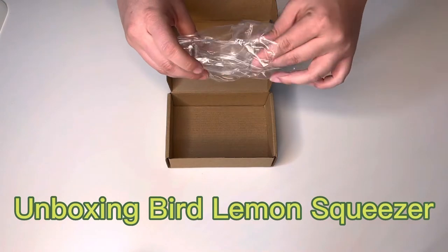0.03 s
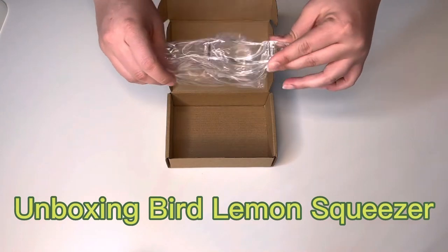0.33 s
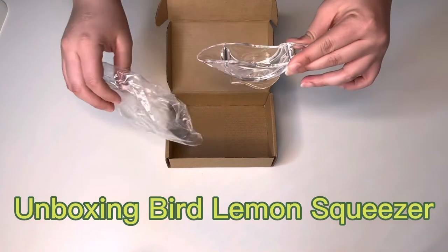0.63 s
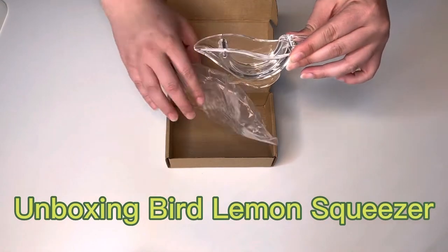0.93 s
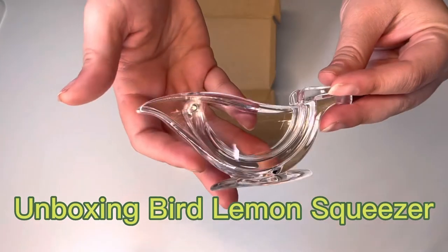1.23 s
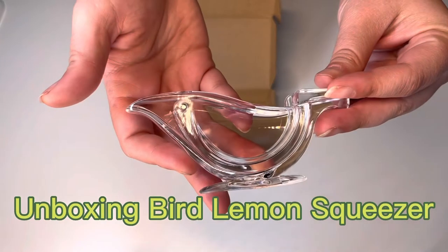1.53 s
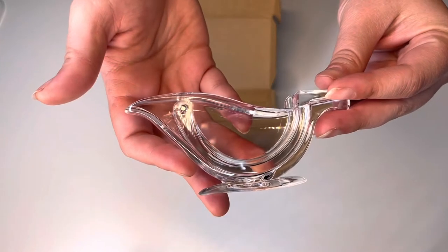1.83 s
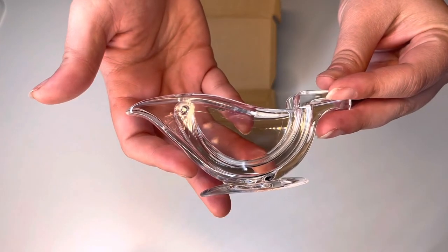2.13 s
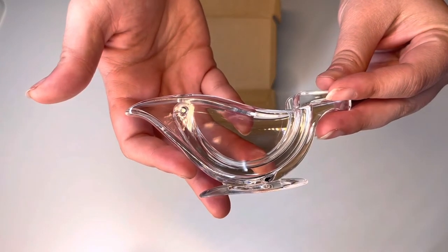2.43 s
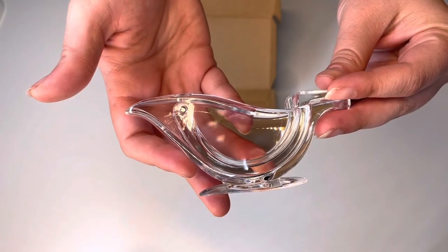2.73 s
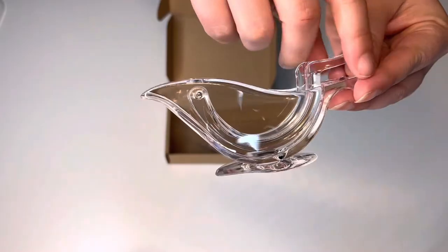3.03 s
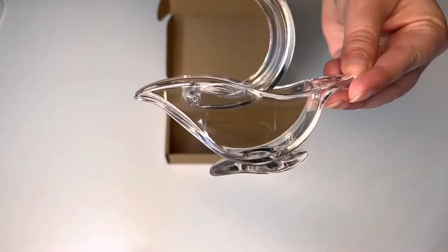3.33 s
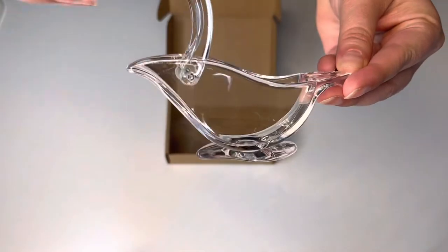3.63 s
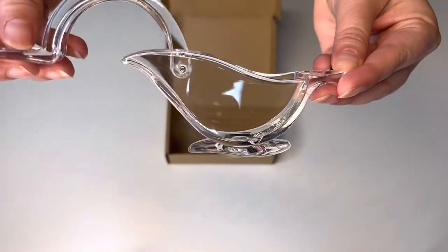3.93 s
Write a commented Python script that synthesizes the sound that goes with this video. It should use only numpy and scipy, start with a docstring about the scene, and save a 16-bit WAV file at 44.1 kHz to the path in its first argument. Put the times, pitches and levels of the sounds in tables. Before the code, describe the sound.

Close crackling of a thin plastic bag being pulled off a lemon squeezer, with soft bumps on cardboard. A lull follows, then a few light plastic clicks and duller hinge ticks, over the low rumble of a small room.

```python
"""Unwrapping a lemon squeezer

A thin plastic bag snaps and crinkles as its film buckles, pulled off a plastic lemon squeezer
close to the microphone, and drops on a cardboard box. Fingers rub the plastic; the lever is
lifted and clicks against the bowl, and the hinge slips. A small room rumbles and hums
throughout, and the sound drops out briefly twice."""
import sys
import numpy as np
from scipy import signal
from scipy.fft import rfft, irfft
from scipy.io import wavfile
from scipy.ndimage import uniform_filter1d

SR = 44100
rng = np.random.default_rng(int(sys.argv[2]) if len(sys.argv) > 2 else 0)


def unload_audio(sound):
    """Save the sound as a 16-bit wav file, at the path given as the first command line argument."""
    columns = np.transpose(np.atleast_2d(sound))
    # keep every value between -1 and 1, then stretch to whole-number steps
    steps = np.round(np.clip(columns, -1, 1) * 32767)
    wavfile.write(sys.argv[1], SR, steps.astype(np.int16))


N = 176400
TIME_S = np.arange(N) / SR
FREQS_HZ = np.maximum(np.arange(N + 1) * SR / (2 * N), 1)
TOP_HZ = 16000


def from_db(db):
    """Decibels to gain."""
    return 10 ** (np.asarray(db) / 20)


def unit_rms(x):
    """Scale to rms 1."""
    return x / np.sqrt(np.mean(x ** 2) + 1e-20)


def at_hz(table, hz):
    """Read a table on a log-frequency axis."""
    table_hz, values = np.transpose(table)
    return np.interp(np.log(hz), np.log(table_hz), values)


def colour(x, gain):
    """Apply a gain per frequency."""
    return irfft(rfft(x, 2 * N) * gain)[..., :N]


def drift(rate_hz):
    """Slow wander between unit-normal random values."""
    knots = rng.standard_normal(1000)
    return np.interp(TIME_S * rate_hz, np.arange(len(knots)), knots)


def add(out, start_s, sound):
    """Mix a sound in at a time."""
    i = int(np.clip(start_s * SR, 0, N - 1))
    out[i:i + len(sound)] += sound[:N - i]


def spread(pair, correlation):
    """Mix two independent signals to left and right with a correlation per frequency."""
    alike = np.clip(at_hz(correlation, FREQS_HZ), -1, 1)
    mid, side = colour(pair, np.sqrt(np.array([1 + alike, 1 - alike]) / 2))
    return np.array([mid + side, mid - side])


# Ventilation noise: (frequency [Hz], density [dB])
RUMBLE_SPECTRUM = [(20,-26.5), (32,-17.5), (45,-1.5), (60,0.5), (74,3.5), (92,-11.5), (140,-5.5), (180,-10),
                   (206,-6.5), (250,-12.5), (320,-19.5), (520,-19), (700,-29), (1000,-29), (2000,-48),
                   (4000,-56.5), (7000,-64), (11500,-66), (15000,-75)]
# Rumble, left to right: (frequency [Hz], correlation [-1..1])
RUMBLE_CORRELATION = [(60,.98), (150,0.94), (380,.5), (950,-0.35), (2400,0.085), (6000,0.41), (8500,.93),
                      (12000,0.82)]

def background(rumble_db=-49.5, hum_hz=119.1, hum_db=-56, waver_hz=0.48, waver_db=4):
    """Ventilation rumble and a wavering mains hum."""
    gain = from_db(at_hz(RUMBLE_SPECTRUM, FREQS_HZ)) * (FREQS_HZ > 15)
    rumble = spread(colour(rng.standard_normal((2, N)), gain), RUMBLE_CORRELATION)
    pitch_hz = hum_hz + waver_hz * drift(8.8)
    hum = np.sqrt(2) * np.sin(2 * np.pi * np.cumsum(pitch_hz) / SR)
    return from_db(rumble_db) * unit_rms(rumble) + from_db(hum_db + waver_db * drift(7.8)) * hum


def crack(spectrum, t60_at_2khz_s, bass_db=0, treble_db=0, modes=60, size=900):
    """A buckle or contact rings short modes at random pitches, the high ones dying first; peak 1."""
    edges = np.linspace(np.sqrt(200), np.sqrt(TOP_HZ), modes + 1)
    hz = (edges[:-1] + np.diff(edges) * rng.random(modes)) ** 2
    tilt_db = at_hz([(800, bass_db), (2000, 0), (3000, 0), (9000, treble_db)], hz)
    gain = from_db(at_hz(spectrum, hz) + tilt_db) * hz ** 0.25 * rng.choice([-1, 1], modes)
    t60_s = t60_at_2khz_s * (2000 / hz) ** 0.27
    t = TIME_S[:size, None]
    rings = np.sin(2 * np.pi * hz * t) * from_db(-60 * t / t60_s)
    out = rings @ (gain / np.sqrt(t60_s))
    return out / np.abs(out).max()


# Bag film: (frequency [Hz], density [dB])
FILM_SPECTRUM = [(200,-17), (400,-12), (560,-3.5), (750,-1), (1050,-7), (1350,-8.5), (1700,-2.5), (2100,-4),
                 (2700,-3.5), (3300,-1), (4300,-8.5), (6500,-6.5), (8500,-11.5), (11000,-13), (13500,-17.5),
                 (15500,-19)]
FILM_T60_S, BUCKLE_LEAD_S = 0.01, 0.002

def snap(bass_db, treble_db, buckles=4, weaker_db=-8.5):
    """A crease gives way in a run of buckles, the strongest BUCKLE_LEAD_S in; peak 1."""
    out = np.zeros(SR // 20)
    for k in range(buckles):
        lag_s, db = (rng.uniform(0, 3) * BUCKLE_LEAD_S, weaker_db) if k else (BUCKLE_LEAD_S, 0)
        add(out, lag_s, from_db(db) * crack(FILM_SPECTRUM, FILM_T60_S, bass_db, treble_db))
    return out / np.abs(out).max()


def pop(hz, modes=120, size=1800, width_oct=0.23):
    """A panel of film flips over: a crack strongest around one pitch; peak 1."""
    grid_hz = np.geomspace(200, TOP_HZ, 100)
    hump_db = -20 * np.log10(1 + (np.log2(grid_hz / hz) / width_oct) ** 2)
    return crack(np.column_stack([grid_hz, hump_db]), t60_at_2khz_s=0.012, modes=modes, size=size)


def crinkle(centre_hz=2800, spread_oct=1.2, pop_db=-6):
    """A small facet buckles: a crack of random brightness with a hint of pitch."""
    bass_db, treble_db = rng.normal(0, 2.4, 2)
    hz = centre_hz * 2 ** (spread_oct * rng.standard_normal())
    buckle = crack(FILM_SPECTRUM, FILM_T60_S, bass_db, treble_db, modes=30)
    return buckle + from_db(pop_db) * pop(hz, modes=40, size=len(buckle))


# Loud buckles: (time [s], level [dB], bass [dB], treble [dB])
FILM_SNAPS = [(.038,-40,-19.5,10), (0.0439,-34.5,-21.5,-36.5), (0.067,-38,-7,13.5), (0.0938,-34,-3.5,-1),
              (0.112,-35,-3.5,8), (0.114,-33,19,10), (0.135,-32,1,3), (.142,-31,-9,9), (.166,-29.5,1,8),
              (.174,-28,2.5,-3.5), (.199,-19.5,-10.5,3), (0.2125,-33,-15,13.5), (.230,-28.5,-14.5,4.5),
              (0.233,-23,-6,-1.5), (.2405,-28.5,2.5,6), (0.2533,-27.5,-15,0), (0.2567,-27.5,-10,0),
              (.2645,-26,-16,-4), (.289,-36.5,2.5,-15), (0.3106,-35,-10,20), (.322,-29.5,-7.5,-3.5),
              (.460,-43,9,-1), (.475,-44.5,-2,-15), (.495,-42.5,-13,-12), (.523,-37,12,2.5),
              (.540,-39.5,12.5,1), (.561,-44,7,-4), (0.584,-40.5,14,-2), (.625,-45.5,12,7),
              (.643,-44,11,-0.5), (.658,-43.5,0,3), (0.677,-55,-9.5,19), (.699,-36.5,-1,-17),
              (0.704,-37.5,-10,-6), (0.729,-39.5,6,-6), (0.763,-35,2.5,0), (.794,-36.5,-1,6),
              (.852,-41,11,7), (.862,-35.5,21.5,15.5), (.902,-50.5,-3,6), (.960,-35,5.5,-8.5),
              (.965,-40,4,-22), (1.005,-35.5,10,14), (1.0109,-35.5,5,-0.5)]
# Larger panels flipping: (time [s], pitch [Hz], level [dB])
PANEL_POPS = [(0.0464,1920,-34), (.230,2240,-33), (.322,1760,-29.5), (.961,935,-33.5), (1.010,3537,-43.5)]
# How hard the bag is worked: (time [s], level [dB])
HANDLING_EFFORT = [(0,-49), (.06,-67), (.105,-56.5), (.165,-36), (.205,-39.5), (.225,-43.5), (.24,-36.5),
                   (.26,-40.5), (.30,-45), (.35,-43), (.39,-56.5), (.56,-54.5), (.66,-64.5), (.735,-56),
                   (.82,-65), (.865,-51), (.93,-76), (.97,-66.5), (1.02,-58)]

def bag(snap_gain_db=2, crinkles_per_s=560, crinkle_db=-3, slide_db=-9.5):
    """Loud snaps and pops over a swarm of small crinkles and the hiss of sliding film."""
    snaps, crinkles = np.zeros(N), np.zeros(N)
    for s, db, bass_db, treble_db in FILM_SNAPS:
        add(snaps, s - BUCKLE_LEAD_S, from_db(db + snap_gain_db) * snap(bass_db, treble_db))
    for s, hz, db in PANEL_POPS:
        add(snaps, s, from_db(db) * pop(hz))
    facets = [crinkle() for _ in range(70)]
    strengths = from_db(4 * np.minimum(rng.exponential(1, N), 3.5))
    picks = rng.integers(0, len(facets), N)
    for i in np.flatnonzero(rng.random(N) < crinkles_per_s / SR):
        add(crinkles, i / SR, strengths[i] * facets[picks[i]])
    film_gain = from_db(at_hz(FILM_SPECTRUM, FREQS_HZ)) * (FREQS_HZ > FILM_SPECTRUM[0][0])
    slide = unit_rms(colour(rng.standard_normal(N), film_gain))
    effort = from_db(np.interp(TIME_S, *np.transpose(HANDLING_EFFORT)))
    return snaps + effort * (from_db(crinkle_db) * unit_rms(crinkles) + from_db(slide_db) * slide)


def strike(modes, rise_s=0.00057, grip_detune=0.01, settle_power=1.42):
    """A blow rings a part: grip detunes each mode, and damping grows as the parts settle."""
    t = TIME_S[:4000]
    ring = 0
    for k, (hz, db, t60_s) in enumerate(modes):
        envelope = from_db(db + rng.normal(0, 1) - 60 * (t / t60_s) ** settle_power)
        detuned_hz = hz * rng.normal(1, grip_detune)
        ring += (-1) ** k * envelope * np.sin(2 * np.pi * detuned_hz * t)
    return (1 - np.exp(-t / rise_s)) * ring


# Bag hitting the box: (time [s], level [dB], hardness [dB/octave])
BOX_BUMPS = [(.698,-36,-0.5), (0.727,-46,0.5), (0.9607,-55.5,4)]
# Box resonances: (frequency [Hz], level [dB], t60 [s])
BOX_MODES = [(361,-3,0.026), (550,-10,0.016), (833,-12,0.036), (1120,-10.5,0.01), (1750,-0.5,0.021)]

def box():
    """Hollow taps of the open cardboard box; a harder bump favours the higher modes."""
    out = np.zeros(N)
    lowest_hz = BOX_MODES[0][0]
    for s, bump_db, db_per_oct in BOX_BUMPS:
        modes = [(hz, db + db_per_oct * np.log2(hz / lowest_hz), t60_s) for hz, db, t60_s in BOX_MODES]
        add(out, s, from_db(bump_db) * strike(modes))
    return out


# Friction on plastic: (time [s], t60 [s], level [dB], centre [Hz], width [octaves])
PLASTIC_RUBS = [(1.04,2,-80.5,2130,.55), (1.04,1.4,-88,5000,1.2), (1.04,0.77,-95.5,10900,0.3),
                (3.26,1.55,-75,1710,0.36), (3.39,0.26,-89,10820,0.14)]

def rubbing():
    """Fingers and lever rub the plastic: soft bands of noise that die away."""
    out = np.zeros(N)
    for s, t60_s, db, hz, width_oct in PLASTIC_RUBS:
        band = np.exp(-(np.log2(FREQS_HZ / hz) / width_oct) ** 2)
        hiss = unit_rms(colour(rng.standard_normal(N), band))
        out += hiss * from_db(db - 60 * np.abs(TIME_S - s) / t60_s) * (TIME_S > s)
    return out


# Lever meeting bowl: (time [s], bowl [dB], lever [dB], tick [dB])
LEVER_CLICKS = [(2.947,-61,-52,-48), (2.957,-63.5,-60,-62), (3.0002,-44,-49,-50), (3.012,-61.5,-38,-39.5),
                (3.0165,-43.5,-31,-39.5), (3.0205,-60.5,-38.5,-44), (3.1428,-33,-68,-36.5),
                (3.1466,-58,-62,-48), (3.1731,-57.5,-45,-50.5)]
# Bowl resonances: (frequency [Hz], level [dB], t60 [s])
BOWL_MODES = [(1662,2,0.017), (2980,-9,0.0097), (3650,-10.5,0.0072), (4300,-30,0.011), (4930,-16,0.008),
              (5320,-13,0.01), (7400,-16,0.012), (10700,-30,0.0092)]
# Lever resonances: (frequency [Hz], level [dB], t60 [s])
LEVER_MODES = [(1774,-12.5,0.011), (1995,-5.5,0.022), (2293,-8,0.018), (2700,-3,0.0092), (3020,-13.5,0.016),
               (3860,-20,0.007), (5600,-30,0.0083)]
# Hard plastic tick: (frequency [Hz], density [dB])
TICK_SPECTRUM = [(300,-22), (1000,11.5), (3000,6.5), (4300,0), (5500,9.5), (7500,-10.5), (8500,4.5),
                 (11000,-4), (13000,-16), (15000,-39)]

def lever():
    """Each contact ticks and rings both bowl and lever."""
    out = np.zeros(N)
    for s, bowl_db, lever_db, tick_db in LEVER_CLICKS:
        add(out, s, from_db(bowl_db) * strike(BOWL_MODES) + from_db(lever_db) * strike(LEVER_MODES))
        add(out, s, from_db(tick_db) * crack(TICK_SPECTRUM, t60_at_2khz_s=0.014))
    return out


# Hinge slipping: (time [s], level [dB])
HINGE_SLIPS = [(3.5126,-46), (3.526,-51.5), (3.9,-58.5)]
# Hinge tick: (frequency [Hz], density [dB])
HINGE_SPECTRUM = [(600,-17), (1400,3), (2050,5), (2800,-11), (3400,-17), (4300,-13), (5500,-35), (7500,-37),
                  (11000,-34), (15000,-52)]

def hinge():
    """The hinge slips with dull ticks."""
    out = np.zeros(N)
    for s, db in HINGE_SLIPS:
        add(out, s, from_db(db) * crack(HINGE_SPECTRUM, t60_at_2khz_s=0.019, modes=120))
    return out


# Room decay: (frequency [Hz], t60 [s])
ROOM_DECAY = [(200,.5), (1700,0.28), (2400,0.26), (5000,0.12), (12000,0.087)]
# Reflections, left to right: (frequency [Hz], correlation [-1..1])
ECHO_CORRELATION = [(300,0.93), (1400,-0.72), (2000,0.88), (2700,.1), (4500,1), (6500,0.49), (8500,1),
                    (10000,-0.86), (12000,1)]
# Direct sound: (frequency [Hz], left minus right [dB])
DIRECT_BALANCE = [(300,1), (1000,1), (1400,4.5), (2200,-0.5), (4700,4), (6800,2.5), (8000,0.9), (15000,-1)]

def room(x, tail_db, early_db, early_t60_s, size=26000):
    """Direct sound a little to the left, early reflections off the table, then a diffuse tail."""
    t = TIME_S[:size]
    edges_hz = np.geomspace(150, 18000, 8)
    tail = 0
    for lo, hi in zip(edges_hz, edges_hz[1:]):
        bandpass = signal.butter(2, [lo, hi], "band", fs=SR, output="sos")
        band = signal.sosfilt(bandpass, rng.standard_normal((2, size)))
        t60_s = at_hz(ROOM_DECAY, np.sqrt(lo * hi))
        tail += band * from_db(-60 * t / t60_s) * (t > .006)
    tail = colour(unit_rms(tail), from_db(tail_db))[:, :size]
    early = rng.standard_normal((2, size)) * from_db(-60 * t / early_t60_s) * (t > .001)
    response = (from_db(early_db) * unit_rms(early) + tail) / np.sqrt(size)
    echoes = signal.fftconvolve(x, response, axes=-1)[:, :N]
    direct = colour(x, from_db(np.outer([.5, -.5], at_hz(DIRECT_BALANCE, FREQS_HZ))))
    return direct + spread(echoes, ECHO_CORRELATION)


# Film facets facing all ways, left to right: (frequency [Hz], correlation [-1..1])
FILM_CORRELATION = [(300,0.28), (1400,0.47), (2000,1), (2700,0.71), (4500,0.15), (6500,0.21), (8500,1),
                    (10000,.7), (12000,0.92), (15000,0.99)]
# Reverberation of the squeezer, which radiates treble sideways: (frequency [Hz], level [dB])
SQUEEZER_TAIL = [(900,-14.5), (1700,-15.5), (2500,-20), (3600,-12), (5000,-8.5), (7500,-16.5), (10500,-7),
                 (15000,-15)]

def scene():
    """Bag and box, cut off at the first dropout, then the squeezer, over rumble and hum."""
    film = spread(np.array([bag(), bag()]), FILM_CORRELATION)
    unwrapping = room(film + box(), tail_db=-11.5, early_db=-9, early_t60_s=0.022)
    unwrapping *= TIME_S < DROPOUT_SPANS[0][0]
    plastic = lever() + hinge() + rubbing()
    squeezer = room(plastic[None], at_hz(SQUEEZER_TAIL, FREQS_HZ), early_db=-11.5, early_t60_s=0.028)
    return unwrapping + squeezer + background()


# Stereo microphone: (frequency [Hz], left phase lead [rad])
MIC_PHASE = [(10,0), (1200,.15), (1450,3.1), (1720,6.3), (2150,6.4), (2900,7.4), (4500,7.0), (5700,5.2),
             (6600,5.35), (7500,3.7), (8500,3.14), (9300,2.6), (11200,.05), (13400,-.1), (14000,-2.2),
             (15400,-3.14)]
# Brief level drops: (start [s], end [s])
DROPOUT_SPANS = [(1.023,1.036), (2.9156,2.927)]
DROPOUT_DB, DROPOUT_TICK_DB, DROPOUT_TICK_CORNER_HZ = -24.5, -50.5, 900

def record(dry):
    """The microphone shifts phase between sides; two dropouts each start with a tick; the top is cut."""
    x = colour(dry, np.exp(1j * np.outer([.5, -.5], at_hz(MIC_PHASE, FREQS_HZ))))
    gaps = sum(1.0 * ((TIME_S > start) & (TIME_S < end)) for start, end in DROPOUT_SPANS)
    gain = 1 - uniform_filter1d(gaps, size=60) * (1 - from_db(DROPOUT_DB))
    tick = from_db(DROPOUT_TICK_DB) * np.exp(-2 * np.pi * DROPOUT_TICK_CORNER_HZ * TIME_S[:SR // 20])
    ticks = np.zeros(N)
    for s, _ in DROPOUT_SPANS:
        add(ticks, s, tick)
    lowpass = signal.cheby2(16, 70, TOP_HZ + 900, fs=SR, output="sos")
    return signal.sosfilt(lowpass, x * gain + ticks)


dry = scene()
out = record(dry)
unload_audio(out)
```